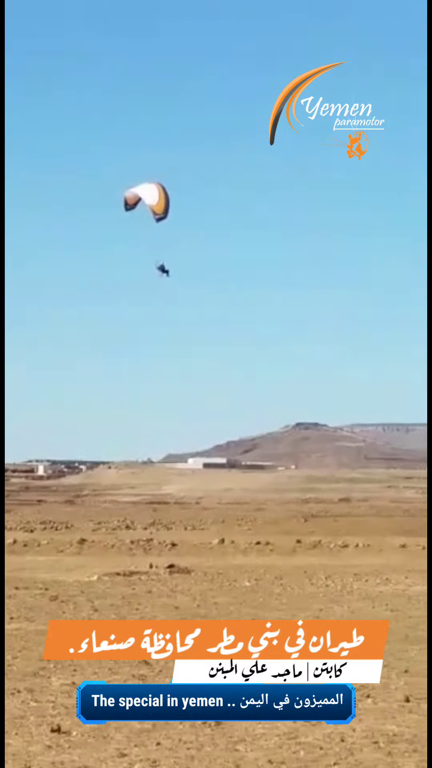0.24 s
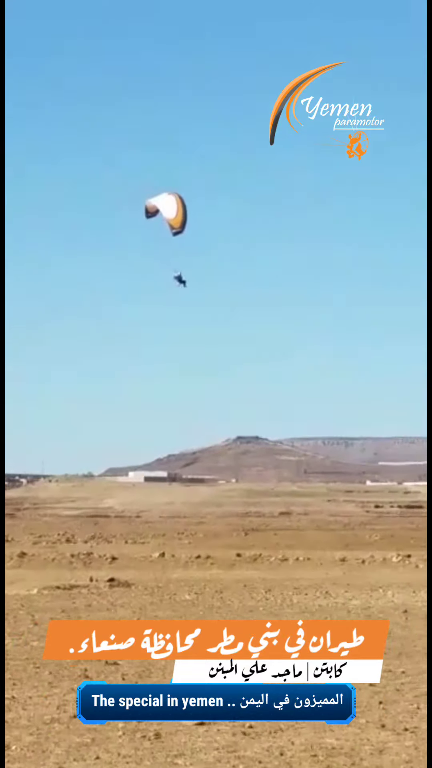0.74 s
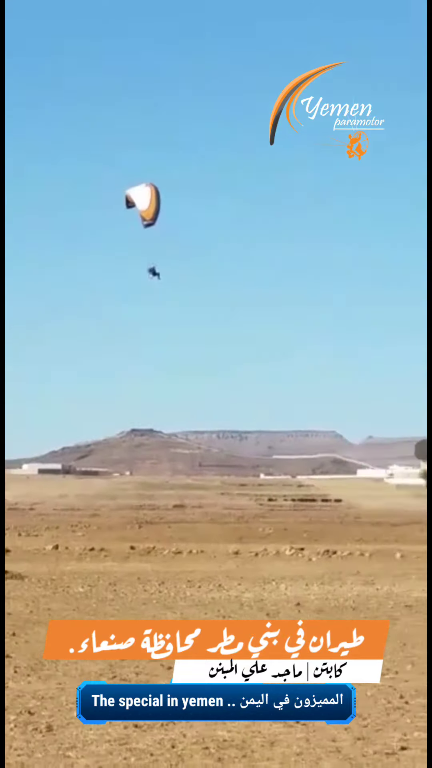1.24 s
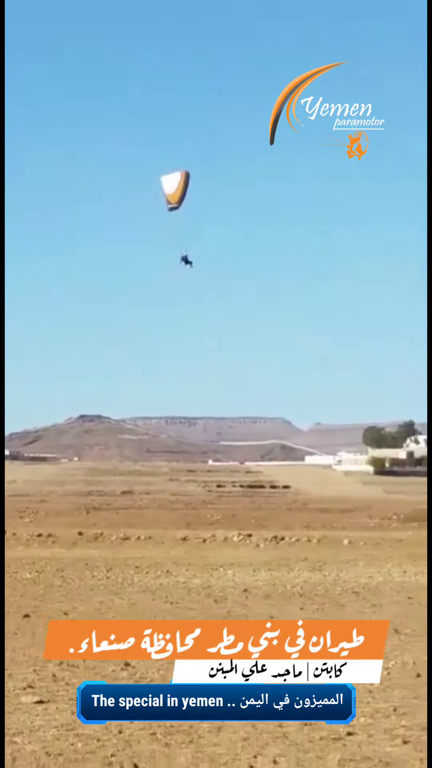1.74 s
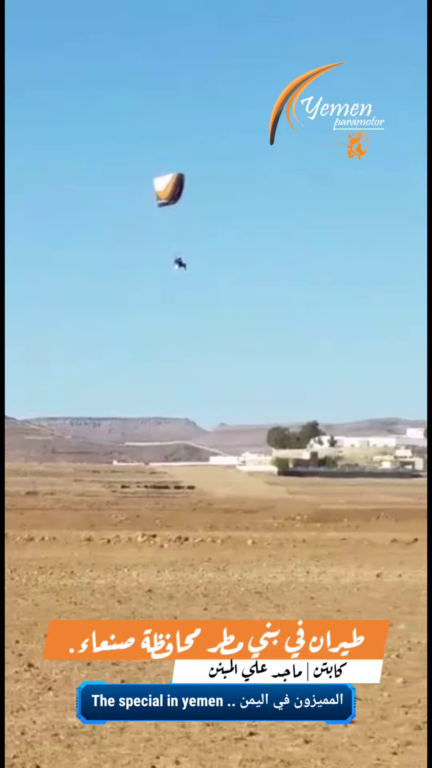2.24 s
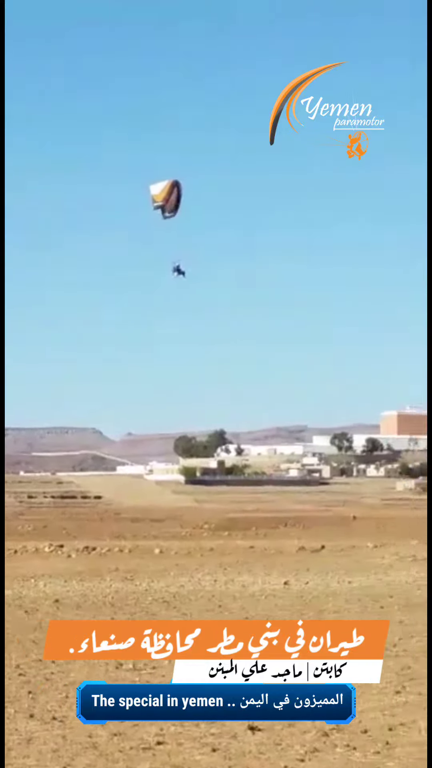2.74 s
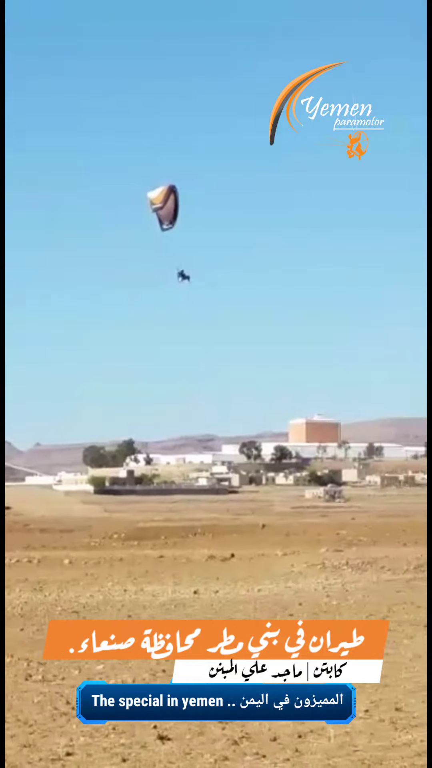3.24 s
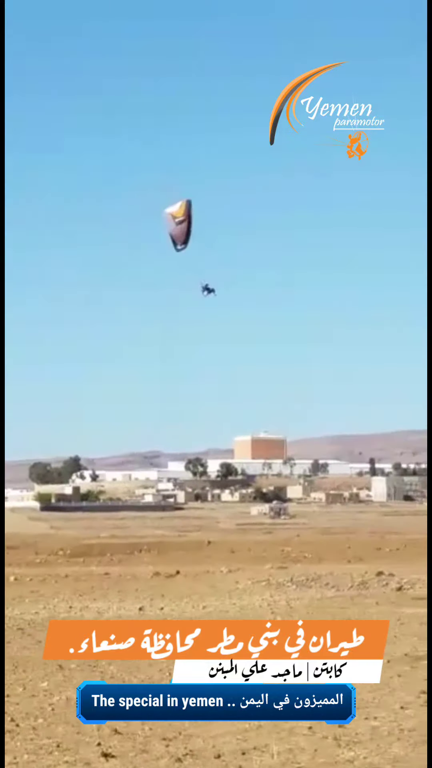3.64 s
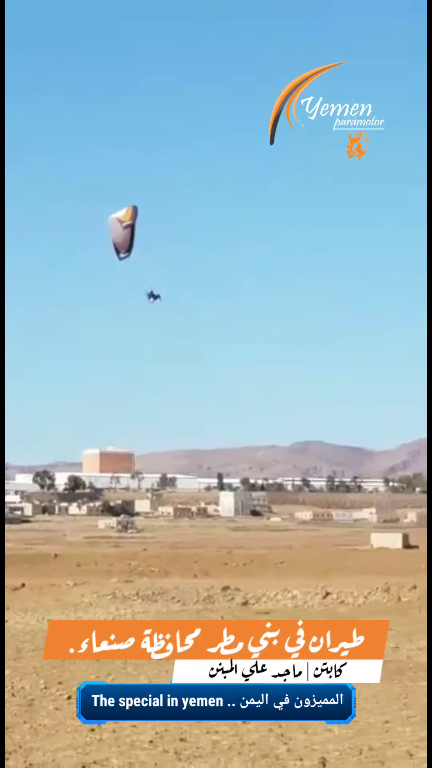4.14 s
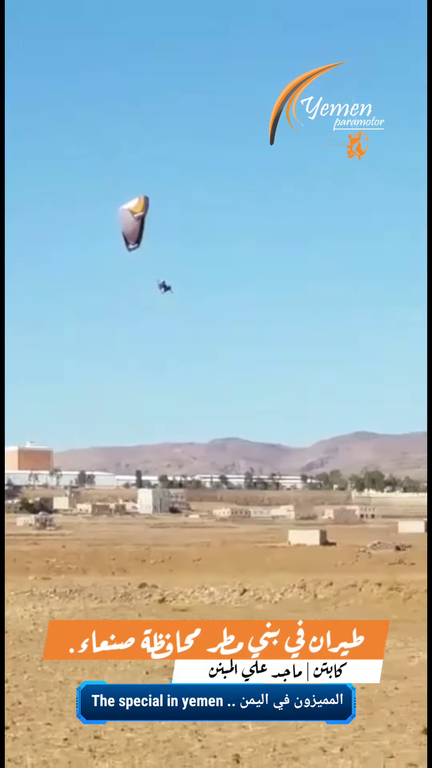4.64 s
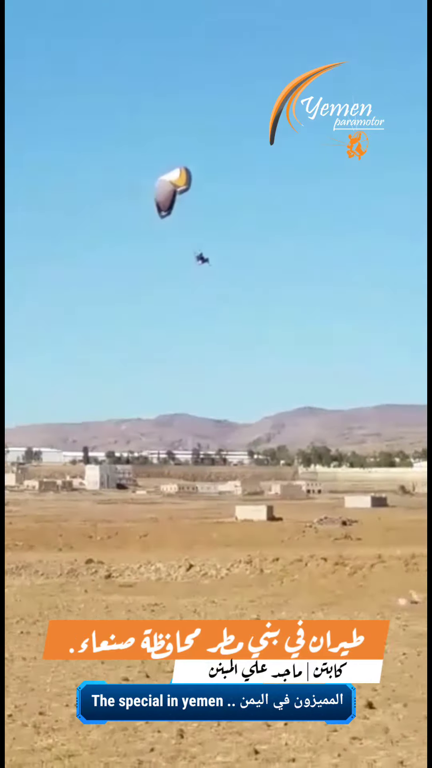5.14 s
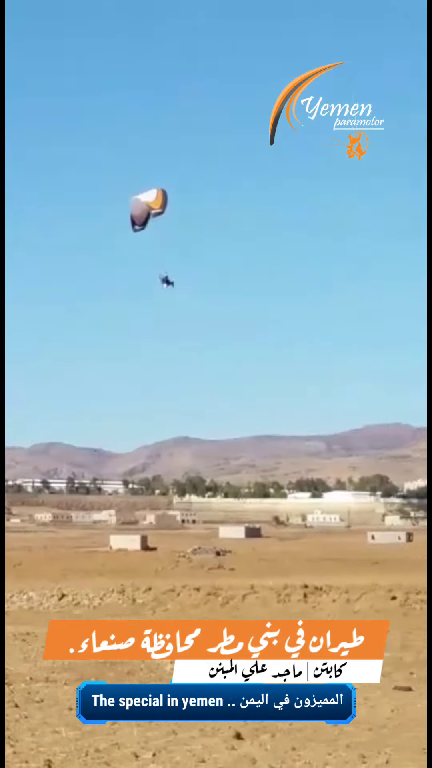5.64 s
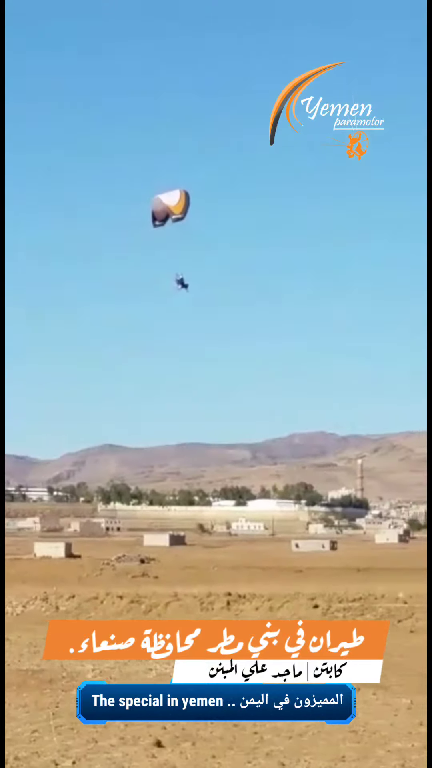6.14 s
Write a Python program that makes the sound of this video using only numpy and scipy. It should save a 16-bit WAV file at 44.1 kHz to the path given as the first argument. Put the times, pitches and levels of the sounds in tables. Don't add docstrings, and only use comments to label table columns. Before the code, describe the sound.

Raspy droning of a powered paraglider circling in open air, its whine shifting slightly, with low wind buffets knocking the right channel.

```python
import sys
import numpy as np
from scipy import signal
from scipy.fft import rfft, irfft
from scipy.io import wavfile
from scipy.ndimage import uniform_filter1d, map_coordinates

SR = 44100
rng = np.random.default_rng(int(sys.argv[2]) if len(sys.argv) > 2 else 0)


def convert_level_to_amplitude(level_db):
    exponent = np.asarray(level_db, float) / 20
    return 10 ** exponent


def materialize(psi):
    bounded = np.clip(np.atleast_2d(psi).T, -1, 1)
    quanta = np.round(bounded * 32767).astype(np.int16)
    wavfile.write(sys.argv[1], SR, quanta)


N = 282240

# multiple of the firing rate (order), share of the bark in dB.
BARK = [(5, -13.5), (6, -5.5), (7, -10), (8, -7), (9, -8.5), (10, -18.5), (11, -9.5)]
# multiple of the blade rate, order of the firing rate added to it,
# share of the layer in dB.
THUMP = [(1, 0, -3.0), (2, 0, -3.5), (2, -1, -9.9), (2, 1, -8.6), (1, -2, -13.5)]
CHOP = [(3, 0, -10.9), (4, 0, -10.6), (2, 2, -9.2), (2, 3, -11.2), (3, 1, -8.1), (3, 2, -6.2), (3, 3, -8.3),
        (4, 1, -18.3), (4, 2, -17.7), (5, -1, -15.8), (4, 4, -17.9), (5, 2, -17.8)]
WHINE = [(5, 0, -8.9), (6, 0, -7.4), (7, 0, -4), (8, 0, -15.2), (9, 0, -13.8), (10, 0, -12.5), (11, 0, -12.8),
         (12, 0, -13.3), (13, 0, -17.5), (14, 0, -19.0), (15, 0, -20.1), (16, 0, -21.8), (6, 1, -15.3),
         (7, 1, -17.3), (5, 3, -12.5), (0, 12, -22)]
BLADES_PER_FIRING = 1.718
LEFT_LAG = -2
# frequency in Hz, level in dB per Hz.
AIR_BODY = [(150, -18.5), (260, 10), (420, -5.5), (650, 5), (850, 5), (1100, 0), (1350, -6), (1600, -30.5)]
AIR_MIDDLE = [(1000, -29), (1350, -9), (1650, 1.5), (2050, -1), (2400, -5.5), (2750, -17.5), (3300, -45)]
AIR_EDGE = [(2200, -38), (2700, -1), (3050, -1.5), (3500, -5.5), (4000, -12.5), (4800, -18), (5500, -28),
            (6200, -60)]
# frequency in Hz, level in dB per Hz.
RUMBLE = [(10, -37.5), (25, -20), (42, -11), (60, -1), (85, -1), (115, -0.5), (160, -2.5), (230, -14.5),
          (330, -26.5)]
RUMBLE_LEFT = [(10, -29.5), (25, -11.5), (40, -5), (60, -1), (85, -2), (115, -2), (150, -10.5),
               (210, -22.5), (330, -41)]
FLUTTER = [(130, -21), (230, -2), (300, -3.5), (400, -9), (550, -17), (900, -34), (1500, -56.5)]
# time in seconds, peak in dB, pitch in Hz.
SLAPS = [(0.043, -13.5, 175), (0.093, -5, 168), (1.199, -6, 125), (1.254, -8, 133), (1.574, -7.5, 98.2),
         (1.672, -7.5, 127), (1.771, -8, 91), (2.117, -8.5, 83.9), (2.235, -7.5, 141.1),
         (3.61, -12.5, 138.8), (4.419, -8.5, 86.8), (4.826, -13, 106), (4.902, 2, 89.1),
         (5.014, -3.5, 96.9), (5.271, -14, 85), (6.179, -11.5, 95.96)]
SLAPS_LEFT = [
    (.495, -22, 94.6),
    (.61, -20, 133),
    (3.27, -17, 122),
    (4.535, -29, 89.95),
    (5.295, -26, 128.8),
]
# frequency in Hz, width in Hz, lift or notch in dB.
DUCT = [(480, 120, -4), (760, 150, 2), (950, 110, -11), (1230, 150, 4), (1440, 90, -8), (2050, 600, 6),
        (2550, 150, 3), (2770, 90, -7), (3010, 110, 4), (3270, 100, -7), (3490, 130, 4), (3720, 90, -8),
        (3950, 110, 8), (4450, 300, -6)]
# frequency in Hz, level in dB per Hz.
HISS = [(3000, 7.5), (5300, -5.5), (6500, -19), (7300, -23.5), (10000, -27.5), (11800, -7), (14400, -2.5),
        (15000, -35)]
# time in seconds, firing rate in Hz, nearness in dB, how far the exhaust
# faces us in dB, loudest bark order.
FLIGHT = [(0.0, 86.7, -33, -2.5, 6.7), (0.4, 86.65, -33, -1.5, 6.7), (0.9, 86.87, -32, -1, 6.7),
          (1.5, 87.19, -38.5, 2.5, 6.7), (1.9, 87.92, -35.5, 0.5, 6.6), (2.3, 88.53, -35, -5.5, 7),
          (2.9, 88.13, -32.5, -1, 7.5), (3.5, 88.69, -35.5, -4.5, 6.8), (4.05, 88.22, -31, -7, 7.7),
          (4.5, 87.94, -29.5, -2, 8), (4.85, 87.91, -28.5, 1, 8.2), (5.25, 87.82, -28, 2, 7.5),
          (5.6, 87.36, -27.5, 0, 7.1), (5.85, 88.12, -31, 0, 7.5), (6.4, 87.5, -34, 3.5, 7.5)]
LOW_ORDERS_DB = (0.5, -2, -14.5, -22)
# order, middle in seconds, length in seconds, change in dB.
ECHO_DIPS = [(2, 0.092, 0.19, 3), (2, 1.1, 1.3, -20.5), (2, 2.3, 0.65, -16), (2, 2.7, 0.61, -7.5),
             (3, 0.23, 0.22, -14.5), (3, 1.8, 2, 6), (3, 2.8, 0.36, -11.5), (3, 6.2, 0.38, -21),
             (4, 1.3, 1.8, 11), (4, 4.0, 0.68, -9), (4, 5.844, .6, 3.5), (4, 6.3, 1, -9)]
# time in seconds, clarity in dB.
CLARITY = [(0.0, -39.5), (0.72, -55.5), (1.25, -45.5), (1.42, -47), (1.75, -40), (1.95, -50.5),
           (2.3, -42.5), (2.75, -50), (2.93, -39.5), (3.2, -41.5), (3.4, -44), (4.2, -52), (4.63, -36),
           (4.8, -43.5), (5.0, -33.5), (5.24, -35), (5.4, -42), (6.4, -38.5)]
USUAL_CLARITY_DB, USUAL_NEAR_DB = -44, -32
LAYERS = {"bark": (-43, 1.2, .01, 0.12), "thump": (-45.5, .9, .01, -0.76), "chop": (-45.5, .8, .01, 0.27),
          "whine": (-50.5, 0.1, 0.51, 0.58), "body": (-41, .6, .2, -.2), "middle": (-44.5, .01, 0.77, 0.16),
          "edge": (-60, .01, 1.27, -0.5)}
# middle in seconds, length in seconds, lift in dB.
FLARES = [
    (0.037, .2, 10.5),
    (0.529, 0.23, 9.5),
    (1.06, 0.16, 9),
    (1.548, 0.18, 9.5),
    (4.33, 0.22, 5.5),
    (4.635, 0.14, 4.5),
    (4.962, 0.24, 4.5),
    (5.38, 0.17, 11.5),
    (5.8, 0.36, 0.5),
]
# middle in seconds, length in seconds, rumble in dB,
# flutter against rumble in dB.
GUSTS = [(0.0, 0.081, -5.5, -9), (0.202, 0.12, -19.5, -30.5), (.33, 0.094, -23.5, -13.5),
         (0.567, 0.37, -18.5, -8), (0.961, 0.27, -15, -10.5), (1.247, 0.2, -18.5, -9.5),
         (1.416, 0.12, -19, -13), (1.652, 0.24, -26, -7), (1.997, 0.076, -16, -24),
         (2.191, .14, -15.5, -18), (2.594, 0.17, -19, -17), (2.851, 0.28, -17.5, -18.5),
         (3.187, 0.25, -17, -14), (3.6, 0.11, -20.5, -23), (3.828, .2, -26, -20.5), (4.165, 0.22, -22, -16),
         (4.404, 0.18, -25, -23.5), (4.83, 0.049, -12.5, -16), (4.908, 0.076, -13.5, -10.5),
         (5.04, .12, -15.5, -15), (5.23, 0.2, -22.5, -11.5), (5.65, 0.38, -32, -15.5),
         (6.175, 0.07, -30, -11)]
# middle in seconds, length in seconds, rumble in dB.
GUSTS_LEFT = [(0.0, .12, -36), (.5, .12, -26), (.62, .08, -27), (1.78, .1, -39), (2.263, 0.12, -34),
              (2.907, .4, -35.5), (3.14, 0.046, -29), (3.27, .1, -28), (3.53, .1, -27.5),
              (3.954, 0.083, -30), (4.54, 0.078, -28.5), (4.66, 0.085, -28), (4.85, 0.1, -34),
              (5.08, .09, -26), (5.281, 0.21, -28), (5.7, 0.34, -31.5), (6.1, 0.063, -27)]
# time in seconds, level in dB.
BREEZE = [(0, -25), (3.3, -25), (4.4, -36.5), (6.4, -46)]
BREEZE_LEFT_DB, BREEZE_FLUTTER_DB = -45, -18
# middle in seconds, length in
# seconds, level in dB.
AIR_SWELLS = [
    (1.08, 0.38, -49),
    (1.674, 0.32, -45.5),
    (2.107, 0.23, -50),
    (2.561, 0.14, -48),
    (3.044, 0.25, -46.5),
    (3.575, 0.19, -47.5),
    (3.838, .3, -53),
    (4.382, 0.14, -55.5),
    (5.7, 0.53, -56),
]
# frequency in Hz, level in dB per Hz.
SWELL_COLOUR = [(1450, -39), (1750, -4.5), (2050, 3), (2450, -7.5), (2750, -40)]


def evened(x):
    return x / np.sqrt(np.mean(x ** 2) + 1e-20)


def columns(rows):
    s, *values = np.transpose(rows)
    return [np.interp(np.arange(N) / SR, s, v) for v in values]


def colour(x, points):
    f, db = np.transpose(points)
    hz = np.fft.rfftfreq(N, 1 / SR)
    gain = convert_level_to_amplitude(np.interp(np.log(hz + 1), np.log(f), db, -120, -120))
    return evened(irfft(rfft(x) * gain, N))


def wander(rate_hz, count):
    steps = rng.standard_normal((count, int(N / SR * rate_hz) + 3))
    steps = signal.lfilter([1], [1, -.3], steps)
    at = np.arange(0, N + 32, 32) / SR * rate_hz
    coarse = [map_coordinates(evened(row), [at], order=3) for row in steps]
    return np.repeat(coarse, 32, axis=1)[:, :N]


def bump(s, length, order=2):
    t = np.arange(0, N + 64, 64) / SR
    away = 2 * (t - np.array(s)[:, None]) / np.array(length)[:, None]
    return np.exp(-np.log(2) * away ** order)


def fine(coarse):
    return np.interp(np.arange(N), np.arange(len(coarse)) * 64, coarse)


def layer_db(name):
    db, facing, clear, near = LAYERS[name]
    near_db, facing_db = columns(FLIGHT)[1:3]
    clarity_db = uniform_filter1d(columns(CLARITY)[0], size=3000)
    db = db + facing * facing_db
    db = db + clear * (clarity_db - USUAL_CLARITY_DB)
    return db + near * (near_db - USUAL_NEAR_DB)


def gusting(s, length, db, breeze_db):
    gust_power = convert_level_to_amplitude(db)[:, None] ** 2 * bump(s, length, order=4)
    return 10 * np.log10(fine(gust_power.sum(0)) + convert_level_to_amplitude(breeze_db) ** 2)


def tones(turns, share_db, fade_db, drift):
    fade, slip = wander(6, count=len(turns)), wander(6, count=len(turns))
    strength = convert_level_to_amplitude(share_db + fade_db * fade)
    return np.sqrt(2) * (strength * np.sin(2 * np.pi * turns + drift * slip)).sum(0)


def phone_hiss():
    return convert_level_to_amplitude(-69.5) * np.array([colour(v, HISS) for v in rng.standard_normal((2, N))])


def grit_tick():
    t = np.arange(N) / SR - 3.707
    return convert_level_to_amplitude(-64) * np.exp(-(t / .0012) ** 2) * np.sin(2 * np.pi * 10300 * t)


def wind(rumble_db, flutter_db, rumble, lumpy_db):
    sizes = convert_level_to_amplitude(2.3 * np.minimum(rng.exponential(1, N), 5))
    signs = rng.choice([1., -1.], N, p=[.55, .45])
    strikes = rng.random(N) < 450 / SR
    eddies = sizes * signs * strikes * convert_level_to_amplitude(lumpy_db * wander(40, count=1)[0])
    steady = []
    for x in (colour(eddies, rumble), colour(eddies, FLUTTER)):
        power = uniform_filter1d(uniform_filter1d(x ** 2, size=3000), size=3000)
        steady.append(x / np.sqrt(power + 1e-6))
    return convert_level_to_amplitude(rumble_db) * steady[0] + convert_level_to_amplitude(flutter_db) * steady[1]


def slaps(rows):
    out = np.zeros(N)
    for s, db, hz in rows:
        u = np.arange(-2, 2, hz / SR)
        push = (1 - 2 * (4.3 * u) ** 2) * np.exp(-(4.65 * u) ** 2)
        ring = 0.37 * np.cos(2 * np.pi * u) * np.exp(-(u / 3.6) ** 2)
        start = round((s - 1.46 / hz) * SR)
        out[start:start + len(u)] += convert_level_to_amplitude(db + 0.5) * (push + ring) * np.hanning(len(u))
    return out


def duct(x):
    hz = abs(np.fft.fftfreq(4096, 1 / SR))
    db = 2.96 + sum(d * np.exp(-((hz - f) / w) ** 2) for f, w, d in DUCT)
    response = np.exp(np.conj(signal.hilbert(np.log(convert_level_to_amplitude(db)))))
    taps = np.fft.ifft(response).real[:2048]
    return signal.oaconvolve(x, taps)[:N]


def rasp(turns, high_orders):
    puff = np.exp(1.1 * np.cos(2 * np.pi * (turns + .15))) * (1 + .3 * np.cos(np.pi * turns))
    puff = evened(puff)
    flicker = convert_level_to_amplitude(1.3 * wander(25, count=3))
    noise = evened(rng.standard_normal(N)) + .035 * high_orders
    air, puffed = (2.4 + puff) * noise, (1.1 + puff) * noise
    body = convert_level_to_amplitude(layer_db("body") + 3.5) * colour(air, AIR_BODY) * flicker[0]
    middle = convert_level_to_amplitude(layer_db("middle")) * colour(air, AIR_MIDDLE) * flicker[1]
    edge = convert_level_to_amplitude(layer_db("edge") + 3.0) * colour(puffed, AIR_EDGE) * flicker[2]
    ring = convert_level_to_amplitude(gusting(*np.transpose(AIR_SWELLS), -72)) * colour(air, SWELL_COLOUR) * flicker[1]
    return convert_level_to_amplitude(-7.5) * (ring + body + middle + edge)


def propeller(turns):
    s, length, db = np.transpose(FLARES)
    flare_db = fine((db[:, None] * bump(s, length)).sum(0)) - 0.5
    out = 0
    for table, name in zip((THUMP, CHOP, WHINE), ("thump", "chop", "whine")):
        blade, order, share_db = np.transpose(table)[:, :, None]
        multiple = blade * BLADES_PER_FIRING + order
        share_db = share_db + (np.round(multiple, 1) == 12) * flare_db
        out = out + convert_level_to_amplitude(layer_db(name)) * tones(multiple * turns, share_db, fade_db=2.5, drift=1.0)
    return out


def engine(turns):
    near_db, _, centre = columns(FLIGHT)[1:]
    which, s, length, depth_db = np.transpose(ECHO_DIPS)
    dips = depth_db[:, None] * bump(s, length)
    low_db = []
    for k, db in enumerate(LOW_ORDERS_DB, start=1):
        low_db.append(near_db + db + fine(dips[np.round(which) == k].sum(0)))
    low = tones(np.arange(1, 5)[:, None] * turns, np.array(low_db), fade_db=0.0, drift=0.033)
    order, share_db = np.transpose(BARK)[:, :, None]
    swing_db = 5 * np.exp(-((order - centre) / 0.54) ** 2) - 2.5
    bark = tones(order * (turns + .15), share_db + swing_db, fade_db=1.0, drift=0.1)
    return low + convert_level_to_amplitude(layer_db("bark")) * bark


def scene():
    turns = np.cumsum(columns(FLIGHT)[0]) / SR
    high_orders = tones(np.arange(13, 28)[:, None] * turns, 0, fade_db=4, drift=.9)
    tonal = engine(turns) + propeller(turns + 0.1528)
    air, scattered = rasp(turns, high_orders), rasp(turns, high_orders)

    early = np.roll(tonal + 0.66 * air, LEFT_LAG)
    gust_db = gusting(*np.transpose(GUSTS_LEFT), BREEZE_LEFT_DB)
    left_wind = wind(gust_db, gust_db - 30, RUMBLE_LEFT, lumpy_db=4.5) + slaps(SLAPS_LEFT)
    left = early + .5 * scattered + left_wind

    s, length, db, flutter_db = np.transpose(GUSTS)
    breeze_db = columns(BREEZE)[0]
    rumble_db = gusting(s, length, db, breeze_db)
    flutter_db = gusting(s, length, db + flutter_db, breeze_db + BREEZE_FLUTTER_DB)
    right_wind = wind(rumble_db, flutter_db, RUMBLE, lumpy_db=4.0) + slaps(SLAPS)
    right = duct(tonal + air) + right_wind
    return np.array([left, right]) + grit_tick()


def band_limit(x):
    return signal.sosfilt(signal.butter(12, 14560, fs=SR, output="sos"), x)


def record(dry):
    sample = np.arange(N)
    settle = 1 - .58 * np.exp(-sample / 60)
    settle = settle * np.minimum((N - sample) / 30, 1)
    limited = np.tanh(dry) - .0011
    return band_limit(settle * limited + phone_hiss())


dry = scene()
out = record(dry)
materialize(out)
```